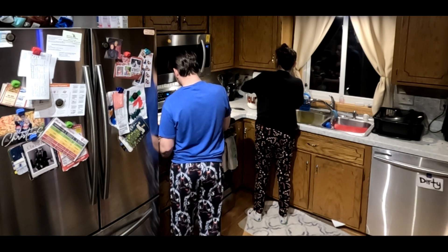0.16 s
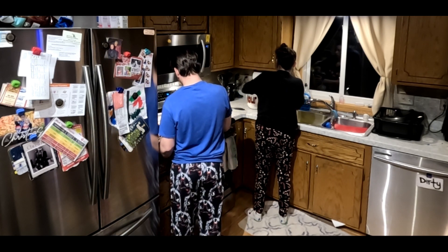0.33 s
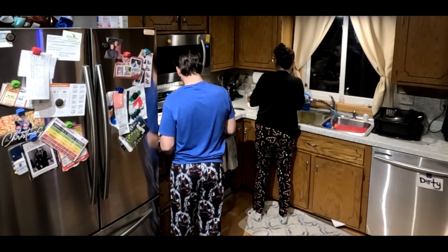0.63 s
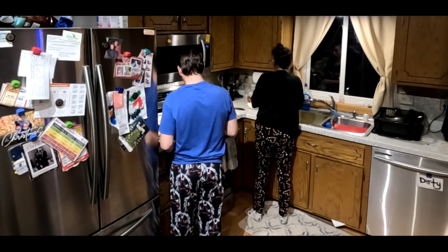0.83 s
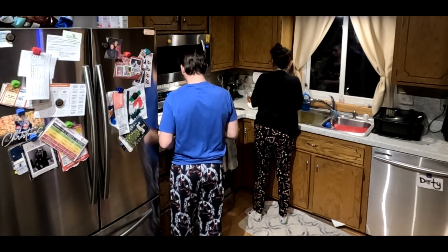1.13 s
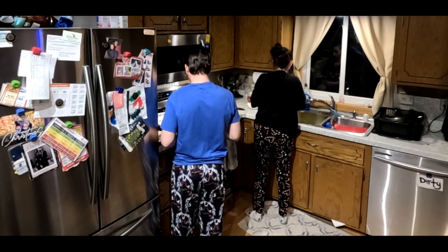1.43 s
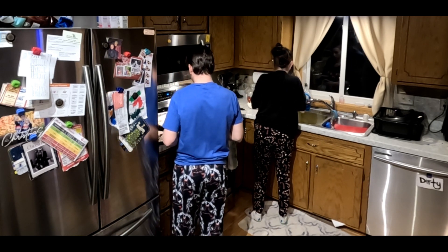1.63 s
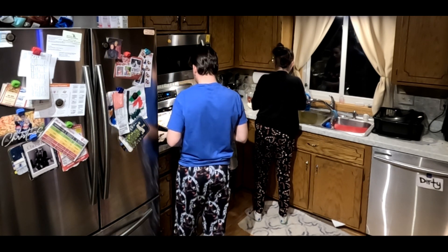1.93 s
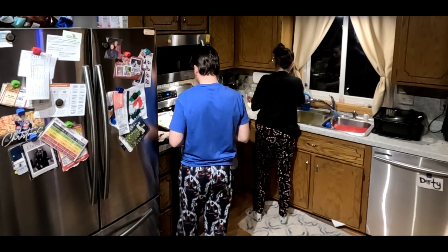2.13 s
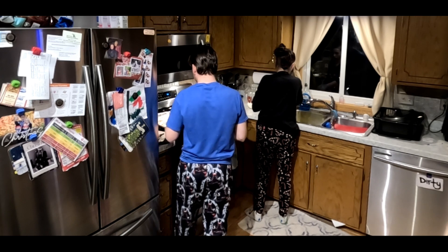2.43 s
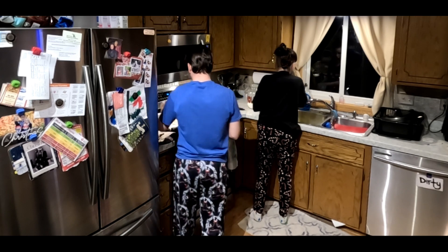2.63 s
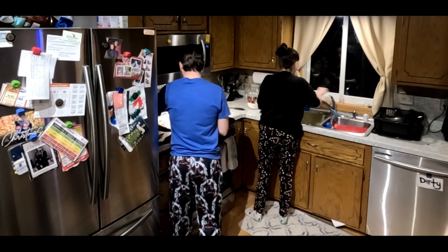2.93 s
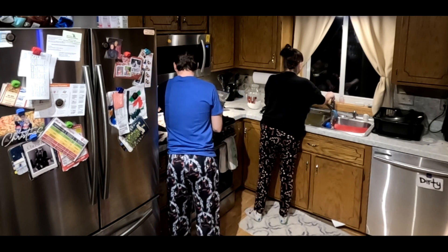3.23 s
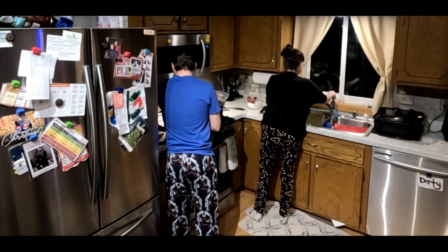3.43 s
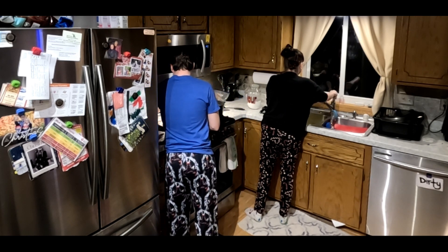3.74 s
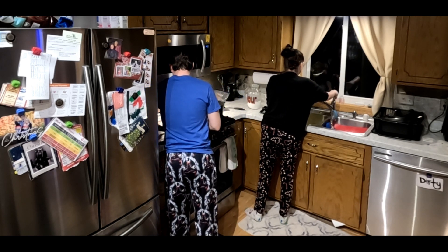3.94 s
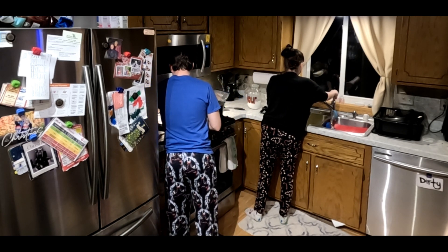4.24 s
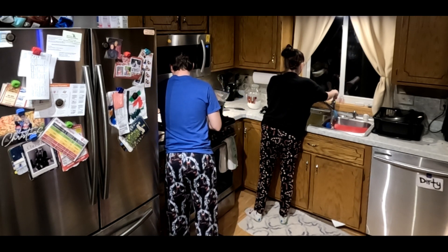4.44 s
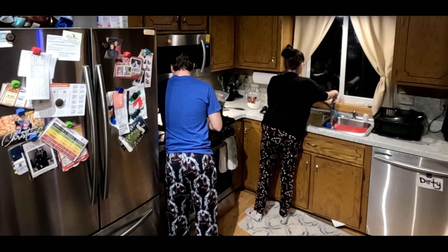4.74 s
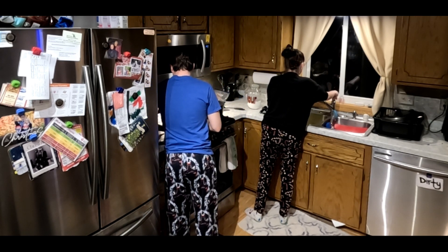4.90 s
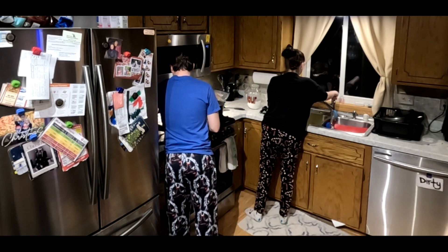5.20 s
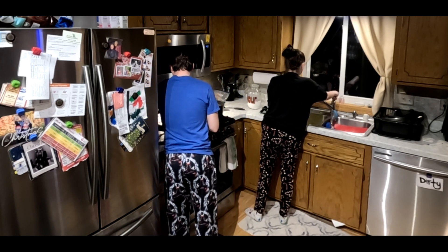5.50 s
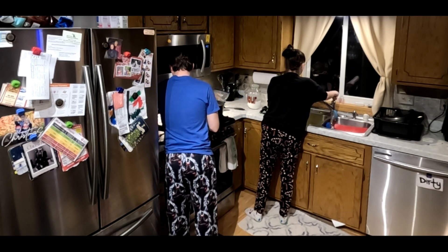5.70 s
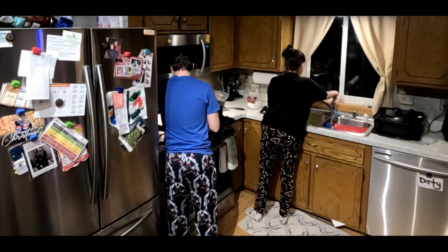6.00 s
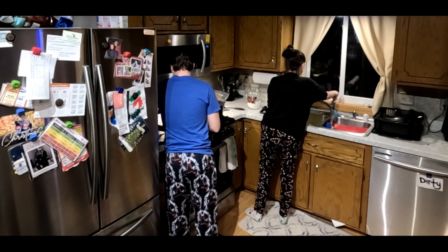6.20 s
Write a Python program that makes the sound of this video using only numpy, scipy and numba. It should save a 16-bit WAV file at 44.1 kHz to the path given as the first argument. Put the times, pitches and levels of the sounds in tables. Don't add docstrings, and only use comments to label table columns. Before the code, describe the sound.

Irregular knocks of cutlery and wood open the scene, turning into gritty little slides, then near silence. One sharp cupboard slam dominates, with a short indoor ring. Feet and sleeves shuffle quietly before the faucet comes on quickly, briefly singing, then rushing steadily with splashes as hands disturb the stream. Heard from a few metres in a lightly reverberant kitchen over faint room air.

```python
import sys
import numpy as np
from scipy import signal
from scipy.fft import rfft, irfft
from scipy.io import wavfile
from scipy.ndimage import uniform_filter1d
from numba import njit

SR = 44100
rng = np.random.default_rng(int(sys.argv[2]) if len(sys.argv) > 2 else 0)


def gain_from_decibels(decibels):
    exponent = np.asarray(decibels, float) / 20
    return 10 ** exponent


def waveform_to_disk(signal):
    frames = np.transpose(np.atleast_2d(signal))
    scaled = np.clip(frames, -1, 1) * 32767
    samples = np.round(scaled).astype(np.int16)
    wavfile.write(sys.argv[1], SR, samples)


N = 280476
T = np.arange(N) / SR
HZ = np.maximum(np.arange(N // 2 + 1) * SR / N, 1.)

# frequency in Hz, width in Hz, level in dB.
TRAY = [(1003, 80, -4.5), (1450, 96, 5.5), (2230, 100, -20)]
# frequency in Hz, level in dB per Hz.
CUTLERY = [(1290, -14), (2200, -4), (2570, 1), (2800, 0.5), (3340, -3.5), (3960, -3), (4520, -10),
           (6160, -9), (8330, -24), (9800, -28), (14000, -89.5)]
# frequency in Hz, common share from 0 to 1.
LIKENESS = [(100, 0.48), (300, 0.3), (700, 0.25), (1500, 0.71), (3000, 0.49), (6000, 0.93), (9500, 0.92),
            (13000, .4)]


def unit(x):
    return x / np.sqrt(np.mean(x ** 2))


def along(table, hz):
    points = np.array(table)
    return np.interp(np.log(hz), np.log(points[:, 0]), points[:, 1])


def colour(x, table):
    return unit(irfft(rfft(x) * gain_from_decibels(along(table, HZ)), N))


def body(x, table):
    cep = irfft(np.log(gain_from_decibels(along(table, np.arange(1, 1026) * SR / 2050))))[:1024]
    cep[1:] *= 2
    response = irfft(np.exp(rfft(cep, 2048)))[:1024]
    response = response / np.sqrt(np.sum(response ** 2))
    return signal.fftconvolve(np.atleast_2d(x), response[None], axes=1)[:, :N]


def band(x, lo_hz, hi_hz):
    return signal.sosfilt(signal.butter(N=2, Wn=[lo_hz, hi_hz], btype="band", fs=SR, output="sos"), x)


def ring(x, modes):
    total = 0
    for k, (hz, width_hz, db) in enumerate(modes):
        b, a = signal.iirpeak(hz, hz / max(width_hz, 1.), SR)
        total = total + (-1) ** k * gain_from_decibels(db) * signal.lfilter(b, a, x)
    return total


@njit
def sweep(x, hz, q):
    y, b, l = np.empty(len(x)), 0., 0.
    for i in range(len(x)):
        g = np.tan(np.pi * hz[i] / SR)
        v = (b + g * (x[i] - l)) / (1 + g * (g + 1 / q[i]))
        b, l, y[i] = 2 * v - b, l + 2 * g * v, v / np.sqrt(q[i])
    return y


def walk(rate):
    hold = int(SR / rate)
    levels = np.repeat(rng.standard_normal(int(T[-1] * 60) + 9), hold)[:N]
    return unit(uniform_filter1d(uniform_filter1d(levels, hold), hold))


def grit(scatter_db):
    return unit(rng.standard_normal(N) * gain_from_decibels(scatter_db * rng.exponential(size=N)))


def diffuse(likeness):
    mid, side = rfft(rng.standard_normal((2, N)))
    like = np.clip(along(likeness, HZ), 0, 1)
    sign = np.array([[1], [-1]])
    return irfft(mid * np.sqrt(1 + like) + side * np.sqrt(1 - like) * sign, N) / np.sqrt(2)


def burst(s, length):
    t = np.clip(T - s, 0, 1)
    return (1 - np.exp(-t / 0.00029)) * np.exp(-t / max(length, 1e-4))


def strokes(rows, attack_s, release_s, swell=0.):
    s, held = np.array(rows)[:, :1], np.abs(np.array(rows)[:, 1:2])
    rise = np.clip((T - s) / (attack_s + swell * held), 0, 1) ** 2
    return rise * np.exp(-np.clip(T - s - attack_s - held, 0, None) / release_s)


def placed(x, pan_db):
    return x * gain_from_decibels(np.array([[pan_db], [-pan_db]]) / 2)


def knocks():
    # start in seconds, peak in dB,
    # wooden body in dB, metal edge in dB, rattle length in seconds.
    contacts = [(0.01, -45.5, -17, -22, 0.0066), (0.0216, -34.5, -21.5, -16.5, 0.0084),
                (0.171, -40.5, -11.5, -19, 0.0061), (0.216, -64.5, 0, 4.5, 0.0053),
                (0.2582, -40.5, -7, -11, 0.0058), (0.269, -43.5, -9, -8, 0.0037),
                (0.4183, -44.5, -15, -22.5, 0.003), (0.4843, -61.5, -30, -15, 0.011),
                (0.647, -46, -15.5, -12, .005), (0.743, -51, -18, -20, 0.0064),
                (0.784, -48, -22, -14, 0.0057), (0.874, -49.5, -21, -6, 0.0042),
                (1.0173, -47.5, -10.5, -7, .0043), (1.131, -53, -20, -3.5, 0.011),
                (1.311, -60, -23, -17, 0.0026), (2.7046, -54, -5.5, -12, .006),
                (3.58, -64.5, -20.5, -8.5, 0.014), (3.905, -59, -29, -4.5, 0.007),
                (4.468, -51.5, -20, -7, 0.018), (4.8772, -42, -12, -13.5, 0.0072),
                (4.8934, -42, -18, -8, 0.0092)]
    # frequency in Hz, width in Hz, level in dB.
    drawer = [(317, 160, -0.5), (608, 120, 8.5)]
    shiver_db, shiver_s = -14.5, 0.018
    push = 0
    for s, db, wood_db, metal_db, length in contacts:
        rattle = burst(s, length) + gain_from_decibels(shiver_db) * burst(s, shiver_s)
        push = push + gain_from_decibels(db + np.array([0, wood_db, metal_db]))[:, None] * rattle
    rough = grit(1.04)
    on_tray, on_wood, on_metal = [placed(p * rough, -1) for p in push]
    tray = gain_from_decibels(13.0) * ring(on_tray, TRAY) + gain_from_decibels(-2.5) * on_tray
    tray = band(band(tray, 1050, 2300), 710, 6600)
    wood = gain_from_decibels(19.5) * ring(on_wood, drawer) + gain_from_decibels(8.5) * on_wood
    wood = band(band(wood, 250, 750), 220, 860)
    return tray + wood + gain_from_decibels(4.5) * body(on_metal, CUTLERY)


def boards():
    # start in
    # seconds, hold in seconds, deep level in dB, boom level in dB.
    thumps = [(0.163, 0.033, -37, -54), (.25, .06, -49, -72), (1.68, 0.025, -63, -100),
              (2.55, 0.16, -71, -56.5), (2.76, .13, -88, -65.5), (2.948, 0.049, -79, -60),
              (3.19, 0.052, -62, -71), (3.45, 0.15, -69.5, -85.5), (3.73, 0.014, -64, -93),
              (4.87, 0.031, -104, -58.5), (5.6, 0.027, -88, -79), (5.88, 0.086, -92.5, -68)]
    # start in seconds, peak in dB, pitch in Hz, brightness in dB.
    steps = [
        (2.962, -56, 129.6, -2),
        (3.021, -60, 200.6, -10),
        (3.075, -58, 163, -20),
        (3.207, -57, 183.5, -25),
        (4.877, -53, 219, -20),
        (5.955, -52, 182, -26),
    ]
    rest_deep_db, rest_boom_db, sway_db = -76.5, -73.5, 1
    still_from_s, still_db = 3.9, -7.5
    deep_db, boom_db = np.array(thumps).T[-2:]
    load = strokes(thumps, 0.025, 0.036)
    deep = unit(band(band(rng.standard_normal(N), 3.4, 60), 8.52, 55))
    boom = unit(ring(rng.standard_normal(N), [(171.3, 47, 3.5), (267, 150, -5.0), (142.3, 15.0, -7.5)]))
    scuff = unit(ring(rng.standard_normal(N), [(320.3, 54, 6), (520, 90, 3), (680, 95, -3)]))
    feet = 0
    for s, db, hz, bright_db in steps:
        thump = np.sin(2 * np.pi * hz * (T - s)) + gain_from_decibels(bright_db) * scuff
        feet = feet + gain_from_decibels(db) * burst(s, 0.018) * thump
    rest_deep = gain_from_decibels(rest_deep_db + still_db * (T > still_from_s) + sway_db * walk(15))
    rest_boom = gain_from_decibels(rest_boom_db + 0.6 * sway_db * walk(16))
    deep = deep * (gain_from_decibels(deep_db) @ load + rest_deep)
    boom = boom * (gain_from_decibels(boom_db) @ load + rest_boom)
    return placed(deep + boom + band(band(feet, 66, 640), 72, 720), -0.1)


def slides():
    # start in seconds, hold in seconds, level in dB, scraped resonance in Hz,
    # broad grit in dB.
    scrapes = [(0.563, 0.047, -60, 1450, -65), (.645, 0.045, -58.5, 1500, -60),
               (.725, 0.071, -48, 1470, -57.5), (.775, .045, -56, 2050, -55.5),
               (.87, 0.043, -57.5, 1770, -66), (1.012, 0.03, -46.5, 2300, -59),
               (1.04, 0.043, -45.5, 2540, -59.5), (1.125, 0.022, -50, 2410, -55.5),
               (1.172, 0.027, -47, 2500, -51.5), (1.295, 0.021, -63.5, 2180, -88),
               (1.335, 0.065, -69.5, 2150, -97)]
    # frequency in Hz, width in Hz, level in dB.
    clink = [(2050, 70, -3), (2780, 70, 2), (3950, 90, -5), (5420, 70, -5)]
    s, held, db, hz, rasp_db = np.array(scrapes).T
    press = strokes(scrapes, 0.0065, 0.014, swell=0.57)
    rub = grit(2.0) * gain_from_decibels(4.0 * walk(57.75))
    hz = np.interp(T, s + held / 2, hz)
    sharp = np.interp(T, s, np.clip(0.66 + 0.24 * (-50 - db), 0.7, 8))
    main = unit(band(sweep(sweep(rub, hz, sharp), hz, sharp), 860, 3600))
    main = main + gain_from_decibels(1.5) * (hz < 1950) * unit(band(ring(rub, TRAY), 1310, 1600))
    rasp = unit(band(body(rub, CUTLERY), 3050, 12400))
    overtone = unit(sweep(rub, 2.0 * hz, 2.9 * sharp))
    rasp = unit(rasp + gain_from_decibels(-17) * overtone + gain_from_decibels(-3) * unit(ring(rub, clink)))
    return placed(gain_from_decibels(db) @ press * main + gain_from_decibels(rasp_db) @ press * rasp, -0.42)


def rustle():
    # start in seconds, hold in seconds, swish in dB, fine hiss in dB.
    brushes = [
        (2.311, .13, -73, -81),
        (2.8, 0.067, -81, -80),
        (3.354, 0.033, -75.5, -69.5),
        (3.42, 0.037, -81, -76),
        (3.49, 0.064, -80, -74),
        (3.575, 0.084, -60.5, -70.5),
        (3.66, .07, -63.5, -76),
        (3.78, .05, -74.5, -73),
    ]
    swish_db, fine_db = np.array(brushes).T[-2:]
    press = strokes(brushes, 0.018, 0.015)
    rub = band(grit(1.3) * gain_from_decibels(1.2 * walk(40)), 700, 9500)
    swish = gain_from_decibels(swish_db) @ press * unit(band(rub, 1600, 5000))
    fine = gain_from_decibels(fine_db) @ press * unit(band(rub, 4600, 7900))
    return placed(swish + fine, -0.8)


def slam():
    # start in seconds, peak in dB, treble in dB.
    hits = [
        (2.451, -48.5, -34.5),
        (2.462, -38, -34.5),
        (2.472, -13.5, 5),
        (2.477, -10.5, -10),
        (2.482, -14, -15.5),
        (2.491, -12.5, -1),
        (2.495, -26, -9.5),
    ]
    # frequency in Hz, level in dB, 60 dB decay in seconds.
    door = [(63, -2.5, 0.9), (177, 1.5, .32), (292, -23.5, 0.33), (329.4, -18.5, 0.36), (432.5, -8, 0.42),
            (543, -9, 0.35), (651, -2.5, 0.19), (728.6, -18, 0.34), (796, -11.5, 0.12), (965, -8.5, 0.14),
            (1105, -11, 0.13), (1200, -8.5, .2), (1290, -11.5, 0.1), (1256, -8.5, 0.19)]
    # frequency in Hz, level in dB per Hz.
    crack = [(59, -57.5), (100, -9.5), (184, -11.5), (241, -6), (582, -2), (646, 4), (797, -6.5),
             (1190, 5.5), (1400, -7.5), (1660, -12), (2270, -26), (5040, -38), (15000, -72)]
    noise = rng.standard_normal(N)
    blows = sum(gain_from_decibels(db) * burst(s, 0.002) for s, db, _ in hits)
    thud = sum(gain_from_decibels(db) * burst(s, 0.0056) for s, db, _ in hits) * noise
    snap = sum(gain_from_decibels(db + treble_db) * burst(s, 0.0043) for s, db, treble_db in hits) * noise
    t = T[:SR // 2]
    longest_s = 0.34
    panel = sum(gain_from_decibels(db - 60 * t / min(t60, longest_s)) * np.sin(2 * np.pi * hz * t) for hz, db, t60 in door)
    modes = signal.fftconvolve(band(blows, 1044, 2500) + 0.032 * blows, panel)[:N]
    broad = body(thud + gain_from_decibels(1.5) * band(snap, 1800, 9000), crack)
    return placed(gain_from_decibels(-21.0) * modes + gain_from_decibels(-4) * broad, 0.5)


def tap():
    # time in seconds, flow in dB.
    opening = [
        (3.9, -30),
        (3.908, -19),
        (3.96, -2),
        (4.04, -0.9),
        (5.15, 0.24),
        (5.4, -1.5),
        (6.36, -0.5),
    ]
    # start in seconds, hold in seconds, dB over the plain splash (below
    hand_moves = [
        (4.23, 0.033, 5),
        (4.36, 0.055, -4),
        (4.465, .09, 4),
        (4.58, 0.11, 6),
        (4.85, 0.044, 4.5),
        (5.42, 0.11, 1.5),
        (6.08, 0.23, 0.5),
    ]
    # frequency in Hz, width in Hz, level in dB.
    spout_modes = [(3985, 12, -9), (4960, 90, -14), (5050, 60, -9), (5121, 26, 1), (5189, 14, -3),
                   (5270, 60, -10), (5335, 25, -10), (5540, 18, -6), (7080, 30, -21), (9470, 35, -11)]
    sink = [(980, 39, -6.5), (1193, 55, 1), (1458, 70, -8), (2040, 290, -4), (2540, 140, -19.5)]
    pocket_modes = [(2500, 52, -7), (3190, 210, 7)]
    # frequency in Hz, level in dB per Hz.
    jet_spectrum = [(1760, -131), (3000, -36), (3870, -6.5), (4530, -32), (5090, 3), (5270, -14),
                    (5840, -11), (6610, -15), (7640, -10), (8820, -13), (9710, -12.5), (11400, -28),
                    (14300, -32), (15000, -35), (15500, -73)]
    splash_spectrum = [(180, -10), (300, -7.5), (500, -11.5), (559, -11), (911, -7.5), (1170, -5.5),
                       (2330, 0.5), (3880, -16), (4500, -5), (5850, -31), (9900, -120)]
    valve_db, spray_db, splash_db, fill_db, pocket_db = -49, -54, -58.5, -59, -54.5
    pocket_until_s, pocket_fade_s = 4.3, 0.073

    flow_db = np.interp(T, *np.array(opening).T)
    hands = 1 + (gain_from_decibels(np.array(hand_moves)[:, -1]) - 1) @ strokes(hand_moves, 0.026, 0.012)
    hiss = unit(ring(rng.standard_normal(N), spout_modes)) * gain_from_decibels(1.6 * walk(59))
    valve = gain_from_decibels(valve_db + 1.8 * flow_db) * hiss
    jet = colour(diffuse(LIKENESS), jet_spectrum) * gain_from_decibels(1.0 * walk(23.77))
    spray = gain_from_decibels(spray_db + 0.53 * flow_db + 3.0) * hands ** 0.36 * jet

    drops = grit(1.4) * gain_from_decibels(1.1 * walk(28))
    splash = hands * colour(drops, splash_spectrum)
    splash = splash + gain_from_decibels(-3.5) * hands ** 0.36 * unit(ring(drops, sink[:3]))
    splash = splash + gain_from_decibels(-13.5) * hands * unit(ring(drops, sink[3:]))
    splash = gain_from_decibels(splash_db + 0.88 * flow_db - 2.5) * splash

    fill = ring(grit(0.99), [(3030, 360, -1.0), (3547, 105, 9), (3610, 200, 4.0)])
    fill = unit(band(fill, 2370, 4400)) * gain_from_decibels(0.99 * walk(21.94))
    fill = gain_from_decibels(fill_db + 1.5 * flow_db + 0.5) * hands ** 0.39 * fill
    fade = np.exp(-np.clip(T - pocket_until_s, 0, None) / pocket_fade_s)
    pocket = gain_from_decibels(pocket_db + 1.6 * flow_db) * fade * unit(band(ring(grit(1.1), pocket_modes), 2200, 3900))
    water = placed(valve, -4) + placed(spray, -0.45) + placed(splash + fill + pocket, -2.2)
    return (T > opening[0][0]) * water


def room(x):
    # frequency in Hz, 60 dB decay in seconds.
    decay = [(60, 0.4), (500, 0.36), (2000, 0.35), (6000, 0.34), (12000, 0.31)]
    # frequency in Hz, common share from 0 to 1.
    wall_likeness = [(100, 1), (300, 0.95), (700, 0.77), (1500, 0.57), (3000, 0.8), (6000, 0.98),
                     (9500, .82), (13000, .4)]
    noise = diffuse(wall_likeness)[:, :SR // 2]
    t = T[:SR // 2]
    tail = 0
    for hz in 45 * 2. ** np.arange(9):
        octave = band(noise, hz / 1.347, min(hz * 1.282, 20000))
        tail = tail + octave * gain_from_decibels(-60 * t / along(decay, hz))
    tail = rfft(tail * np.clip(t / 0.0029, 0, 1))
    evenness = np.sqrt(uniform_filter1d(np.mean(abs(tail) ** 2, axis=0), size=40))
    tail = irfft(tail / evenness)[:, :2 * SR // 5]
    return signal.fftconvolve(band(x, 120, 16000), tail, axes=1)[:, :N]


def air():
    # frequency in Hz, level in dB per Hz.
    air_spectrum = [(150, -1), (250, 0), (761, -9), (844, -12), (1110, -7.5), (1790, -14), (2020, -17),
                    (3380, -22.5), (5850, -23), (7430, -25), (10100, -33.5), (11200, -40), (15000, -49.5)]
    return gain_from_decibels(-69.5) * colour(diffuse(LIKENESS), air_spectrum)


def scene():
    hits, floor, steady, door, water = knocks(), boards(), slides() + rustle(), slam(), tap()
    direct = hits + door + gain_from_decibels(-2) * steady + gain_from_decibels(-1.0) * water + floor
    walls = room(gain_from_decibels(-1.5) * hits) + room(gain_from_decibels(-1.75) * door)
    walls = walls + room(gain_from_decibels(-7) * steady + gain_from_decibels(-4) * water)
    return direct + walls + air()


def band_limit(x):
    return signal.sosfilt(signal.butter(12, 15700, fs=SR, output="sos"), x)


def record(dry):
    # frequency in Hz, lead of the left port in radians.
    ports = [(100, -.02), (1000, -.2), (3000, -.65), (5000, -.6), (7500, -.5), (10000, -.15), (12000, 0)]
    turn = np.exp(0.5j * along(ports, HZ) * np.array([[1], [-1]]))
    hiss_db = -101
    heard = irfft(rfft(dry) * turn, N) + gain_from_decibels(hiss_db) * rng.standard_normal((2, N))
    dull = signal.sosfilt(signal.butter(N=4, Wn=14600, fs=SR, output="sos"), heard)
    dull = signal.sosfilt(signal.butter(N=1, Wn=6, btype="high", fs=SR, output="sos"), dull)
    return band_limit(dull)


dry = scene()
out = record(dry)
waveform_to_disk(out)
```